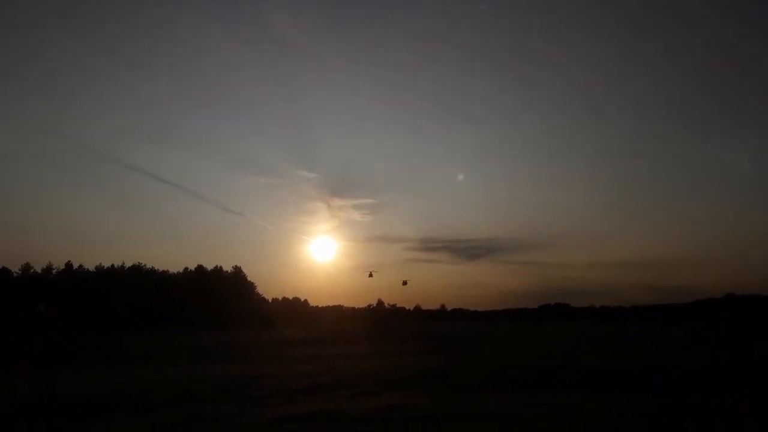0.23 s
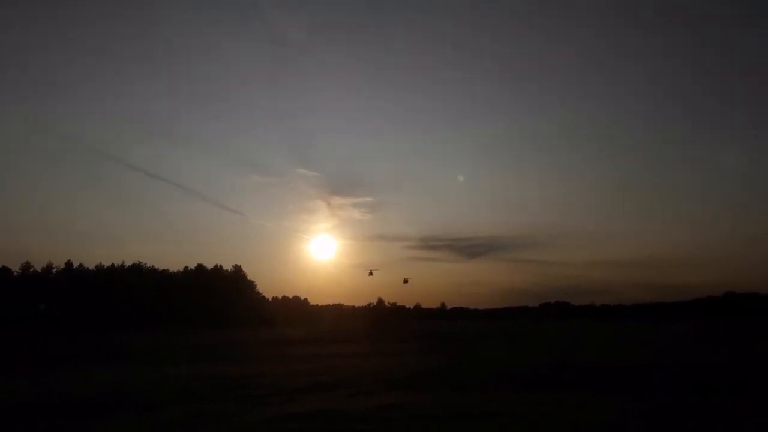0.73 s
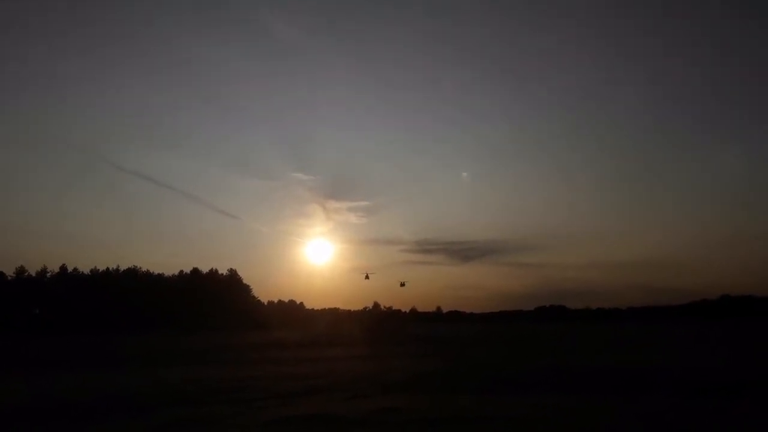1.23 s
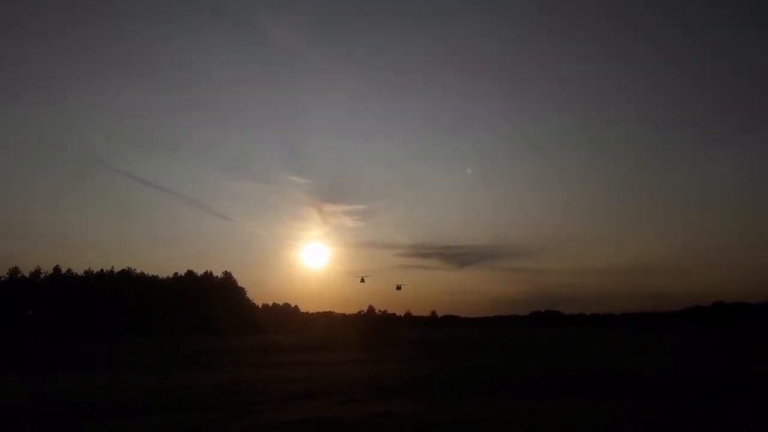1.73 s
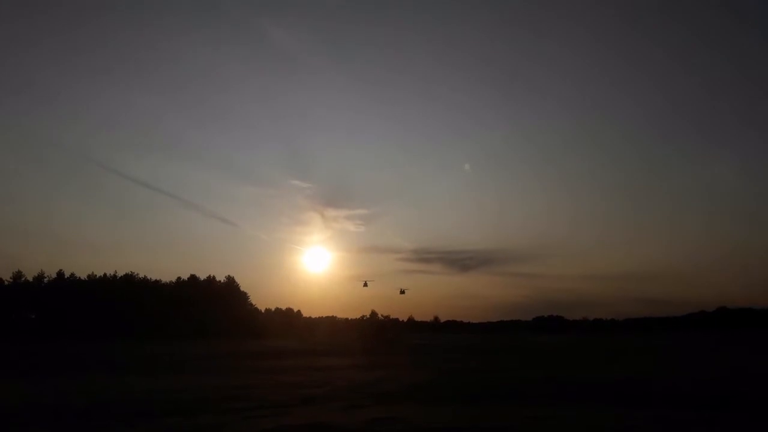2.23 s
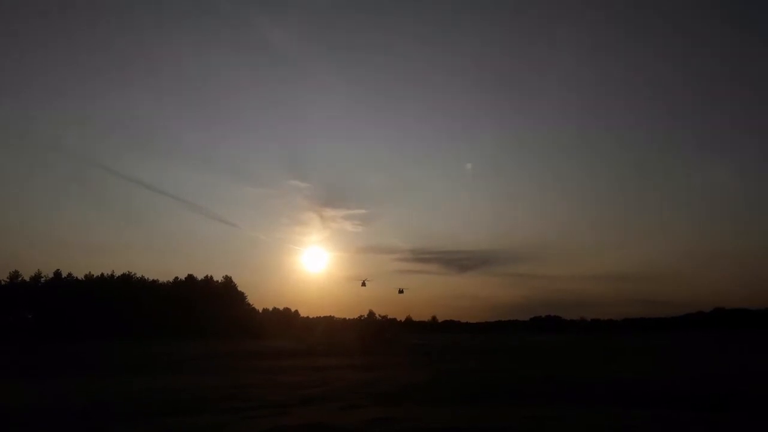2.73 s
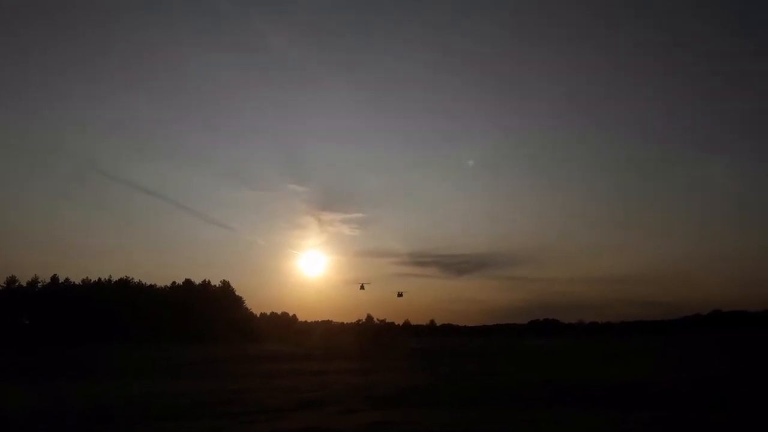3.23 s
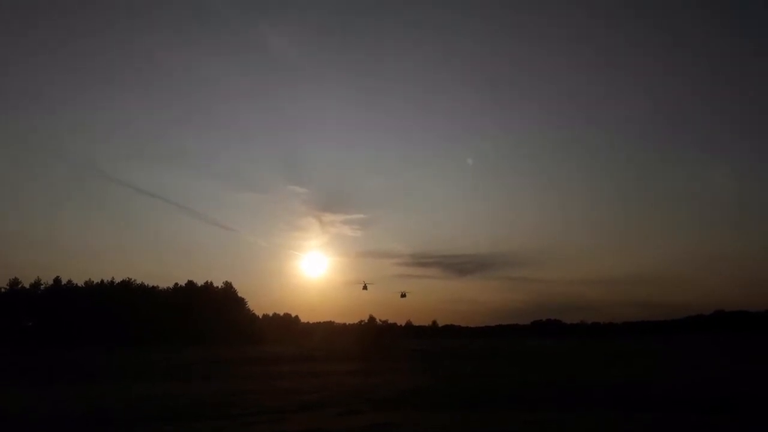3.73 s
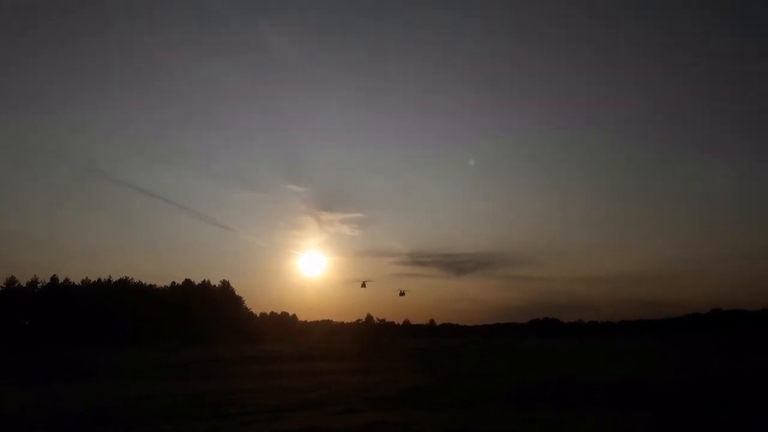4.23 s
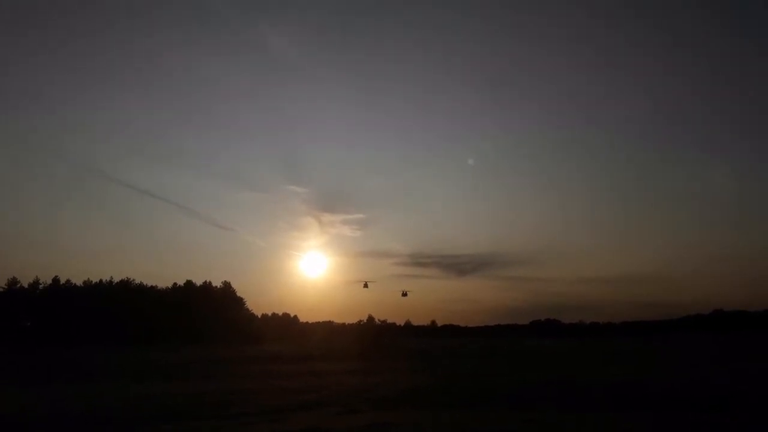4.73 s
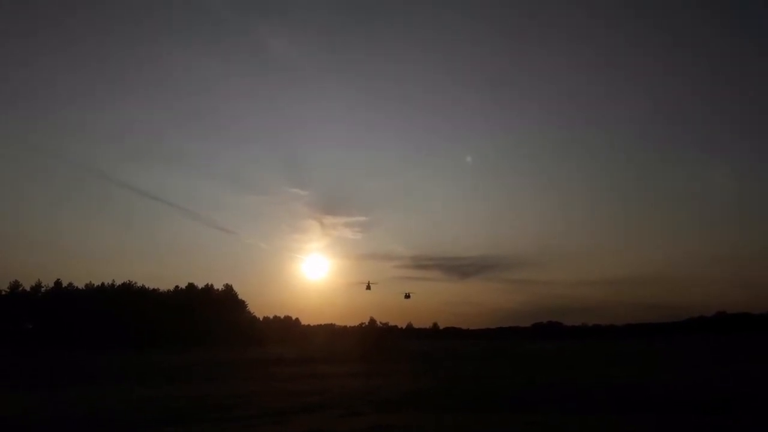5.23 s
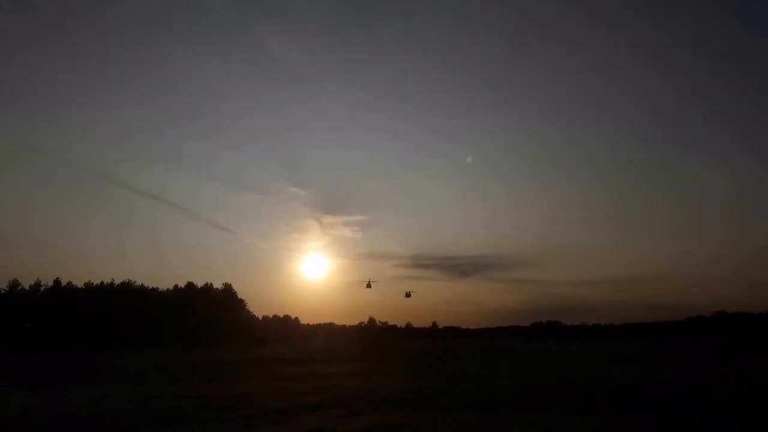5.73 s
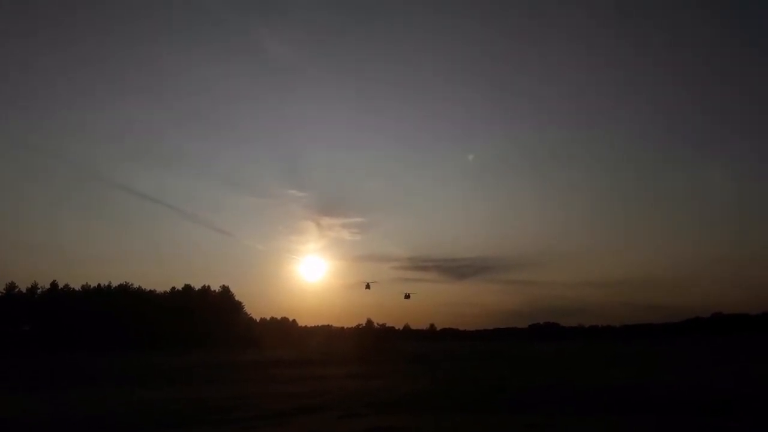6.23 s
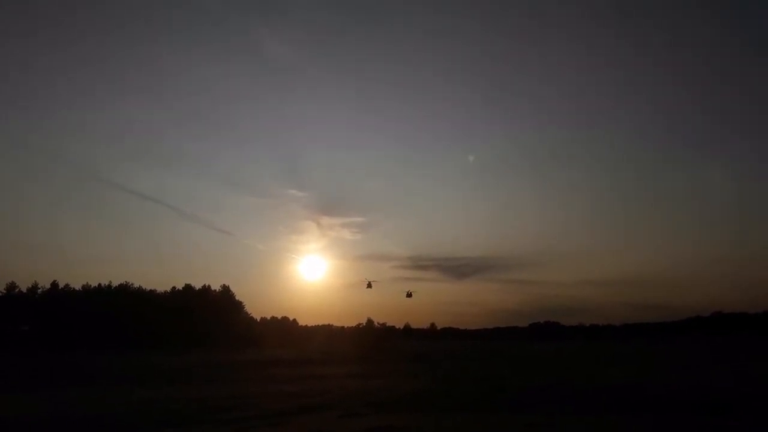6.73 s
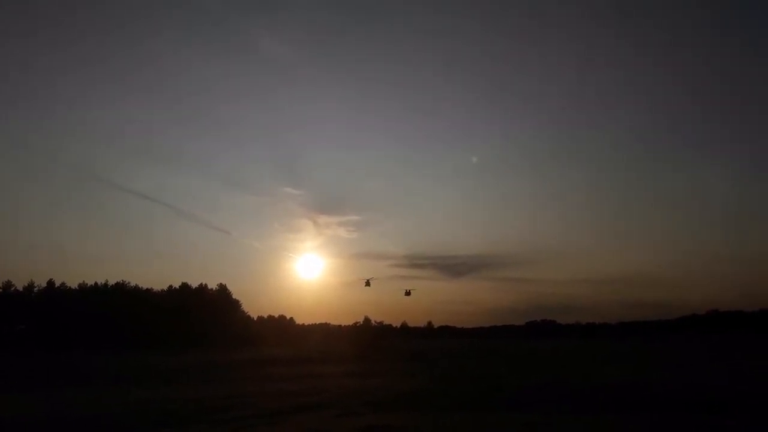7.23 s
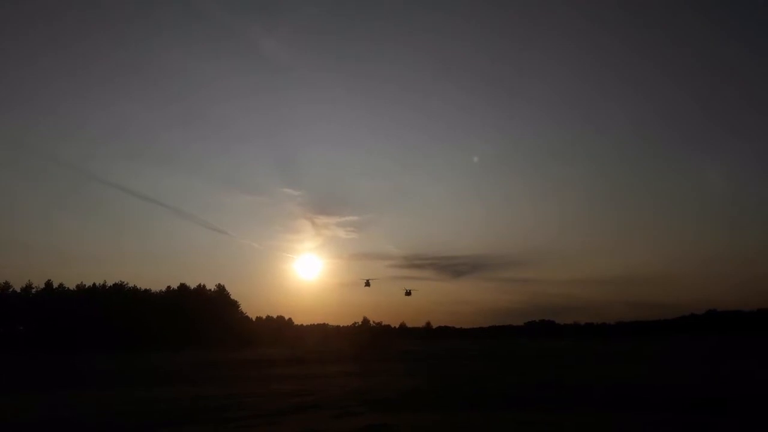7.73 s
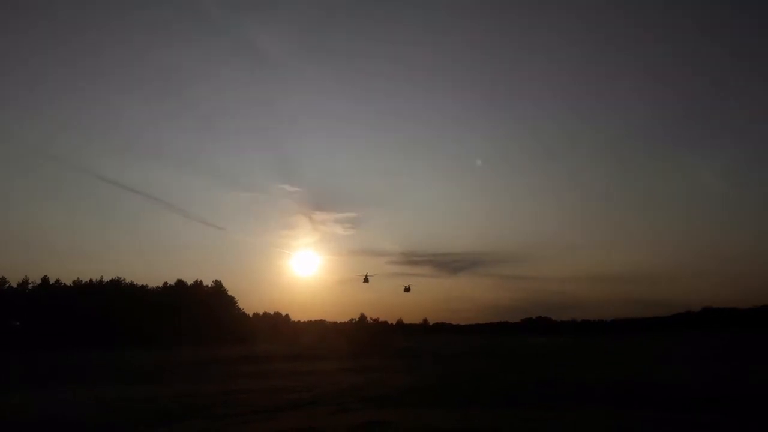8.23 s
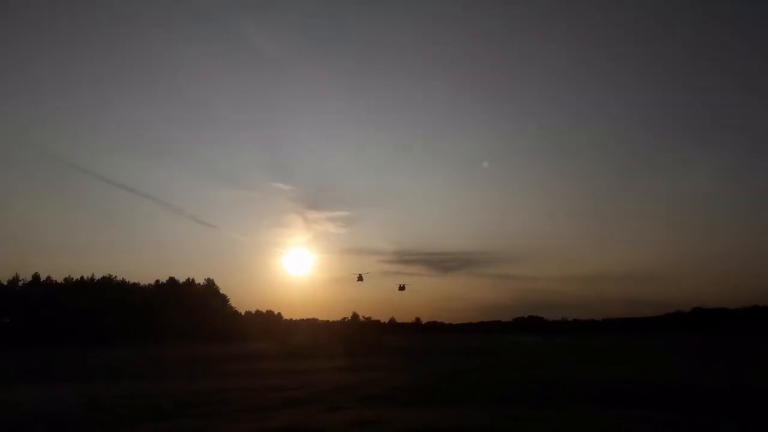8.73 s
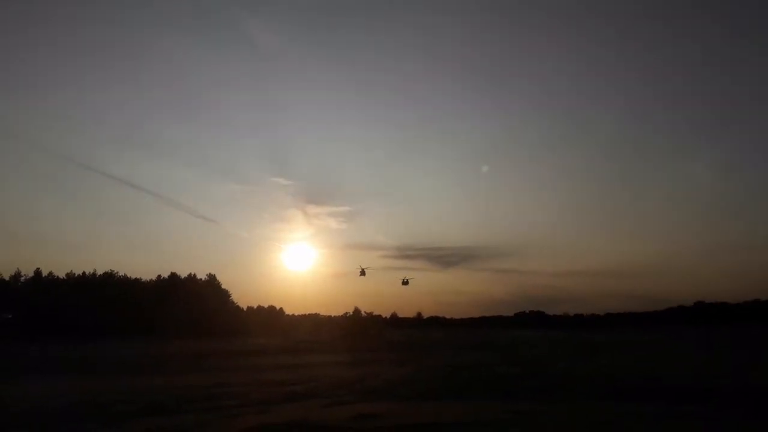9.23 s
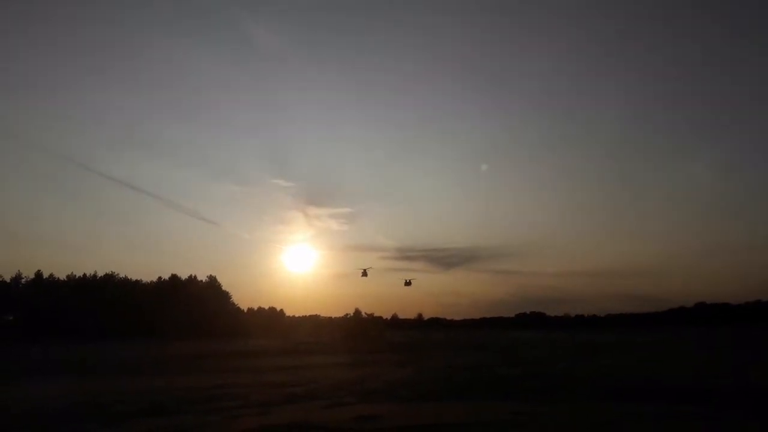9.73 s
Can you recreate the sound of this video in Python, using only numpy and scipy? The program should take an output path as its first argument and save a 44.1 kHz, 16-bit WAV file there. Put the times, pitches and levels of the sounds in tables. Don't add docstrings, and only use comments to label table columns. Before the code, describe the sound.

A distant open-air microphone picks up two heavy helicopters coming closer, their rapid chopping present from the start. Each beat is a low thud with a ragged, fluttering slap, one aircraft's pulses falling between the other's. A short burst of crisp stalk snaps and grass rustle comes close by in the first second. The rotor beat then surges and wavers, gaining crackle and hiss over a steady rumbling wash, with soft ground reflections and faint insects.

```python
import sys
import numpy as np
from scipy import signal
from scipy.fft import rfft, irfft, next_fast_len
from scipy.io import wavfile
from scipy.ndimage import uniform_filter1d, minimum_filter1d, map_coordinates

SR = 44100
rng = np.random.default_rng(int(sys.argv[2]) if len(sys.argv) > 2 else 0)


def attenuation_scalar(level_db):
    decades = np.asarray(level_db, float) / 20
    return 10 ** decades


def output_pcm(signal):
    pcm = np.clip(np.atleast_2d(signal).T, -1, 1) * 32767
    wavfile.write(sys.argv[1], SR, np.round(pcm).astype(np.int16))


N = 440559
BLADE_HZ = 11.8
SLAP_LEAD_S, SLAP_SAMPLES = .04, 4400


def unit(x):
    return x / np.sqrt(np.mean(x ** 2, axis=-1, keepdims=True) + 1e-20)


def along(points, hz):
    f, v = np.transpose(points)
    return np.interp(np.log(hz + 1), np.log(f + 1), v)


def curves(rows):
    s, *cols = np.transpose(rows)
    return [np.interp(np.arange(N) / SR, s, c) for c in cols]


def wobble(rate):
    knots = rng.standard_normal(int(N * rate / SR) + 4)
    return map_coordinates(knots, [np.arange(N) * rate / SR])


def filtered(x, response):
    m = next_fast_len(x.shape[-1] + 2048)
    spectrum = rfft(x, m) * response(np.fft.rfftfreq(m, 1 / SR))
    return irfft(spectrum, m)[..., :x.shape[-1]]


def band(hz, lo_hz, hi_hz):
    return 1 / np.sqrt((1 + (lo_hz / (hz + 1)) ** 8) * (1 + (hz / hi_hz) ** 8))


def aircraft(path, snap_db, snap_rise_db, snap_share, narrow=1):
    # time in s, boom gain in dB, treble gain in dB.
    eddies = [(.116, 2, 0.5), (.202, 4, .1), (.622, 4.5, -3), (.709, -4, -0.5), (1.049, -15, 4),
              (1.302, -17, 1.8), (1.681, 3.5, 1.1), (1.767, -7.5, -0.2), (2.027, -2.5, 1.5),
              (2.359, -1, -5), (2.532, 0, -3.5), (2.612, 9.5, 5.5), (3.034, -1.5, -1), (3.718, 7, 1.5),
              (3.885, -6, -0.5), (4.824, 1, 1.5), (5.422, -4.5, -4), (5.505, 1, -2.5), (6.094, -3.5, 0),
              (6.349, 5, 2), (6.51, -3.5, -0.5), (7.81, 4, 0), (7.981, -5.5, -2.5), (8.063, -1.5, -3.5),
              (8.23, 1, 0.5), (8.397, -5, 1.1), (8.482, 9, 1.5), (8.993, -6, 1), (9.498, -3.5, -0.5),
              (9.753, 4, -1.2)]
    # time in s, gain in dB.
    cracks = [(1.853, 4.5), (2.027, 8), (2.231, 4.5), (3.29, 4), (3.461, 3.5), (3.545, 6), (3.718, 5),
              (5.843, 3), (6.262, -1), (7.142, 3.5), (7.981, -3), (8.482, 2.5), (9.667, 2)]
    jitter_s = .0021
    s, delay_ms, *controls = np.transpose(path)
    turns = np.arange(int(s[0] * BLADE_HZ) - 1, N / SR * BLADE_HZ) / BLADE_HZ
    at = turns + np.interp(turns, s, delay_ms) / 1000
    strength_db, boom_db, comb_db, lag_ms = (np.interp(at, s, c) for c in controls)
    boom_gain_db, treble_gain_db = struck(at, eddies)
    upper_db = strength_db + treble_gain_db
    low_db = strength_db + boom_db + boom_gain_db
    top_db = snap_db + snap_rise_db * at + snap_share * upper_db + struck(at, cracks)[0]
    heard = at + jitter_s * rng.standard_normal(len(at))
    rows = np.column_stack([heard, low_db, upper_db + comb_db, upper_db - comb_db, top_db, lag_ms])
    lasting = np.interp(strength_db, [-36.5, -32], [0.95, 1.074])
    return slaps(rows, narrow * lasting)


def struck(at, events):
    s, *gains_db = np.transpose(events)
    hit = np.abs(at[:, None] - s) < .018
    return [hit @ g for g in gains_db]


def slaps(rows, narrow):
    # time in s, spread in ms, boom top in Hz.
    cluster_growth = [(0, 6.6, 376), (4, 6.56, 353), (5, 8.7, 359), (6.601, 9.2, 340), (7.3, 8.7, 194),
                      (8.4, 7.1, 201), (9.3, 5.3, 315), (10, 8.4, 334)]
    # time in s, pitch factor.
    knock_climb = [(0, 1.28), (1.9, 0.93), (2.6, 0.71), (2.95, 1.65), (3.4, 1.03), (4.8, 0.97), (5.2, 1.14),
                   (5.6, 1.02), (8.4, 1.03), (10, 0.92)]
    start, lag_ms = rows[:, :1], rows[:, 5]
    s, spreads, tops = np.transpose(cluster_growth)
    spread_ms = narrow * np.interp(rows[:, 0], s, spreads)
    top_hz = np.interp(start, s, tops)
    climb = np.interp(start, *np.transpose(knock_climb))

    chance = rng.random((len(rows), 3, SLAP_SAMPLES))
    arrivals = (chance[:, 0] < 600 / SR) * attenuation_scalar(-2.9 * np.log(chance[:, 1] + 1e-4))
    arrivals = arrivals * np.where(chance[:, 2] < .4, -1, 1)
    blur = chance[:, 2] - .5

    boom = cluster(rows, 70 + 0.17 * top_hz, top_hz, arrivals + 0.24 * persistent(rows),
                   spread_ms, lag_ms, rows[:, 1])
    knock = cluster(rows, 355 * climb, 700 * climb, arrivals + 0.66 * blur,
                    1.04 * spread_ms, 0.21 * lag_ms, rows[:, 2], rise=1.15)
    crack = cluster(rows, 1123, 2000, arrivals + 1.2 * blur,
                    1.33 * spread_ms, -.65 * lag_ms - 3.5, rows[:, 3], rise=2.3)
    snap = cluster(rows, 2430, 4000 + 230 * start, arrivals + 0.59 * blur,
                   1.37 * spread_ms, -.3 * lag_ms - 2.5, rows[:, 4], rise=1.7)
    return boom + knock + crack + snap


def persistent(rows):
    turn = round(SR / BLADE_HZ)
    eddies = signal.lfilter([1], [1, -.7], rng.standard_normal((len(rows), turn)), axis=0)
    clock = (np.round(rows[:, :1] * SR).astype(int) + np.arange(SLAP_SAMPLES)) % turn
    return np.take_along_axis(eddies, clock, axis=1)


def cluster(rows, lo_hz, hi_hz, arrivals, spread_ms, lag_ms, db, rise=0.78):
    # frequency in Hz, level in dB per Hz.
    slap_spectrum = [(35, -61.5), (60, -54.5), (88, -4), (223, 6.5), (367, -5.5), (536, -7.5), (1060, -17),
                     (1260, -23.5), (1510, -27.5), (3420, -46.5), (7000, -75.5), (9100, -106),
                     (15400, -120)]
    ms = (np.arange(arrivals.shape[1]) / SR - SLAP_LEAD_S) * 1000
    u = (ms - lag_ms[:, None]) / spread_ms[:, None] + 0.24
    shape = np.exp(-np.abs(np.where(u < 0, rise * u, .5 * u)) ** 2.01)
    burst = filtered(arrivals * shape,
                     lambda hz: attenuation_scalar(along(slap_spectrum, hz)) * band(hz, lo_hz, hi_hz) * ground(hz))
    burst = unit(burst * signal.windows.tukey(len(ms), .3))
    burst = burst * np.sqrt(.025 * SR / len(ms)) * attenuation_scalar(db)[:, None]
    first = np.round((rows[:, :1] - SLAP_LEAD_S) * SR).astype(int)
    at = first + np.arange(len(ms)) + SR
    return np.bincount(at.ravel(), burst.ravel(), N + 2 * SR)[SR:][:N]


def ground(hz):
    echo = 1 + 0.21 * np.exp(-1j * (2 * np.pi * hz / 442 - 2.29))
    return echo * band(hz, 1, 6100) ** 2


def thump(rows):
    # frequency in Hz, level in dB.
    pulse_spectrum = [(18, -59.5), (35, -9), (50, -1.5), (80, 9), (110, 14.5), (170, 1), (260, -47),
                      (500, -110)]
    delay_ms, db = curves(rows)
    blades = BLADE_HZ * (np.arange(N) / SR - delay_ms / 1000)
    pulses = np.diff(np.floor(blades), prepend=0) > 0
    return attenuation_scalar(db) * unit(filtered(1. * pulses, lambda hz: attenuation_scalar(along(pulse_spectrum, hz))))


def wash():
    # frequency in Hz, level in dB per Hz.
    wash_spectrum = [(24, -47), (40, -53.5), (134, 1.5), (240, -5), (387, -6), (547, -13.5), (756, -15.5),
                     (1020, -17.5), (1510, -21.5), (3430, -31.5), (7000, -59.5), (9100, -103),
                     (15400, -120)]
    # time in s, nearness from 0 to 1.
    approach = [(0, 0.06), (1.69, 0.7), (4.48, 0.73), (9.99, 1)]
    # far level in dB, gain when near in dB, lateness as an exponent.
    wash_layers = [
        (-27, 2, 1.6),
        (-39.5, 6, 1.2),
        (-53.5, 16, 1.7),
        (-67.5, 12.5, 5),
    ]
    edges_hz = [(95, 1000), (800, 2260), (2200, 6200), (4300, 2300)]
    near = np.abs(curves(approach)[0])

    def response(hz, lo, hi):
        intake = 1 + 0.9 * np.exp(-((hz - 1500) / 89) ** 2)
        return attenuation_scalar(along(wash_spectrum, hz)) * intake * band(hz, lo, hi) * ground(hz)

    out = np.zeros(N)
    for (lo, hi), (far_db, gain_db, late) in zip(edges_hz, wash_layers):
        db = far_db + gain_db * near ** late - 3.5
        unsteady_db = 0.32 * wobble(10.0) + 0.26 * wobble(40)
        noise = filtered(rng.standard_normal(N), lambda hz: response(hz, lo, hi))
        out += attenuation_scalar(db + unsteady_db) * unit(noise)
    return out


def grass():
    # time in s, length in s, level in dB, centre in Hz, width in Hz.
    rustles = [
        (.836, .012, -42, 9000, 9000),
        (0.87, .02, -39.5, 7500, 6500),
        (0.901, 0.012, -36.5, 6450, 8000),
        (0.93, .016, -55, 7000, 3500),
        (1.35, .028, -61, 7300, 1800),
        (1.51, .0073, -56, 7400, 900),
        (1.554, .016, -55, 7540, 1000),
        (3.249, .01, -52.5, 7100, 900),
    ]
    # time in s, level in dB, frequency in Hz.
    stalks = [
        (0.782, -42, 11000),
        (.7930, -28, 5600),
        (.7956, -39, 11600),
        (0.82, -33.5, 12450),
        (.8238, -28, 5650),
        (0.838, -16.5, 12620),
        (0.846, -32, 8950),
        (0.8811, -9, 7610),
        (0.882, -18, 12850),
        (9.9878, -42.5, 11400),
    ]
    t, out = np.arange(N) / SR, np.zeros(N)
    crackle = attenuation_scalar(3.3 * wobble(900))

    def response(f, hz, width_hz):
        port = 1 - 0.75 * np.exp(-((f - 9700) / 1400) ** 2)
        return (width_hz / 63000.0 + np.exp(-((f - hz) / width_hz) ** 2)) * port * (f < 15700)

    for s, length, db, hz, width_hz in rustles:
        near = slice(round((s - .1) * SR), round((s + .1) * SR))
        grains = rng.standard_normal(len(t[near])) * crackle[near]
        grains = filtered(grains, lambda f: response(f, hz, width_hz))
        out[near] += attenuation_scalar(db) * grains * np.exp(-((t[near] - s) / length) ** 4 / 4)
    u = np.arange(60) / SR
    for s, db, hz in stalks:
        out[round(s * SR):][:len(u)] += attenuation_scalar(db) * np.exp(-u / .00014) * np.sin(2 * np.pi * hz * u)
    return out


def dusk():
    # frequency in Hz, level in dB per Hz.
    hiss_spectrum = [(5000, -40), (6000, -4), (7950, -3), (8050, -11), (10000, -10), (12000, -2),
                     (15700, 0), (15800, -60)]
    # time in s, insects in dB, hiss in dB.
    levels = [(0, -65.5, -71), (1.2, -68.5, -72.5), (2.5, -83.5, -74), (8, -85.5, -75.5), (9.2, -80.5, -78),
              (10, -80, -76)]
    insects_db, hiss_db = curves(levels)
    insects = unit(filtered(rng.standard_normal(N), lambda hz: band(hz, 4200, 7900) ** 4))
    hiss = unit(filtered(rng.standard_normal(N), lambda hz: attenuation_scalar(along(hiss_spectrum, hz))))
    breeze = unit(filtered(rng.standard_normal(N), lambda hz: band(hz, 32, 70)))
    out = attenuation_scalar(-64.5) * breeze
    out += attenuation_scalar(insects_db + 0.84 * wobble(6)) * insects
    return out + attenuation_scalar(hiss_db + .8 * wobble(7.3)) * hiss


def scene():
    # time in s, delay behind the blade clock
    # in ms, strength in dB, boom over it in dB, ground favouring knock over crack in dB, boom lag in ms.
    first = [(.15, 31.3, -33.5, 15.5, -1.5, 1.5), (.5, 29, -33.5, 13, 4.5, 1.8),
             (.9, 30.2, -33.5, 13.5, 1, -1), (1.2, 29, -30.5, 6.5, 8.5, 2), (1.45, 25, -30.5, 1, 4.7, 2),
             (2.2, 29, -29, 12.5, 3.2, 1), (2.9, 20.7, -42.5, 18.5, 3.5, -0.5),
             (3.3, 25.6, -50, 6.5, 3.5, -2.5), (4.8, 18.5, -42.5, 8, 2.5, 0), (5.9, 25, -42, 17.5, 5, -4),
             (6.5, 20.8, -38, 11, 3, 7.5), (6.95, 23.3, -28.5, 4.5, 1.5, -4),
             (7.4, 21, -26.5, 10, 2.5, 4.5), (7.85, 15.6, -25.5, 12, 2, 1.5), (8.3, 9, -23, 9.5, 6.5, 3),
             (8.9, 10.1, -27.5, 12.5, 3.5, -0.3), (9.25, 6.86, -28, 11, -0.3, 3),
             (9.9, 7.7, -26, 9, 4.5, 8)]
    second = [(.1, 65.76, -43.5, 23, -1.5, 0.5), (.9, 66.1, -36, 6.6, -3.5, 4.5),
              (1.35, 64.64, -34.5, 3.7, 2, 4), (1.55, 70.3, -29, 15.5, 8, 1),
              (1.9, 75.45, -24.5, 11, 3, 8.5), (2.15, 74, -24, 12.4, 2, -3.5),
              (2.85, 67.73, -27, 9.2, 3, 2.5), (3.2, 70.43, -28, 14.6, -0.5, 1.5),
              (3.65, 71.03, -23.5, 6.1, 2.3, 2.5), (4.15, 80.14, -23, 8.4, 5.5, 2.5),
              (5.2, 79.77, -28.5, 9.5, 4.5, 6.5), (5.85, 79.24, -19.5, 5.5, 1, 6.5),
              (6.45, 74.05, -21.5, 5.7, 5, 11.5), (6.8, 75.35, -25, 5.4, 6, 7),
              (7.1, 63.95, -33, 3, 0, -1.5), (7.7, 67.96, -39, 3, -4.5, -3.5),
              (8.4, 75.15, -36, 6.8, 8.5, 0.5), (9.4, 80.63, -41, 6.4, -2, 1.5)]
    rear = [(3.2, 31.93, -49.5, 6, -1, 1.5), (4.2, 38.04, -42, 8.5, -5, 1.1),
            (5.3, 39.76, -45.5, 13, -5, 1.4), (6.05, 42, -37, 4.5, 0.5, 1.7),
            (6.7, 43.35, -44, 4.5, -2, 1.6), (7.5, 46.7, -40.5, -5.5, -5, 1.5),
            (8.35, 48.34, -33, 6, -2.5, 0.9), (9.0, 50.75, -45, 9, -6, 1.5), (9.5, 54.8, -48.5, 11, 3, 1.4),
            (10, 58, -34.5, 13.5, -2, 1.6)]
    front = [
        (5.95, 66, -43, -7, .6, .6),
        (6.16, 61, -30.5, -3, .6, .6),
        (6.4, 59.36, -29, -2, 1.1, .6),
        (6.6, 59, -25, -7, .6, 0.75),
        (6.75, 59.5, -62, -6, .6, .6),
    ]
    # time in s, delay in ms, level in dB.
    lead = [(0, 88, -34), (1.2, 67, -37), (2, 87, -27.5), (3, 84, -38), (4, 88, -36), (5, 95, -32.5),
            (6.5, 100, -31.5), (7.5, 110, -28), (8.2, 104, -24.5), (9, 102, -28), (10, 95, -31.5)]
    wing = [(.6, 39.4, -38), (2, 35.15, -36), (3.5, 36.8, -50), (10, 46.4, -33)]
    rotors = aircraft(first, snap_db=-30.5, snap_rise_db=.8, snap_share=0.49)
    rotors += aircraft(second, snap_db=-31, snap_rise_db=0.54, snap_share=0.46)
    rotors += aircraft(rear, snap_db=-26.5, snap_rise_db=1.52, snap_share=0.57, narrow=0.9)
    rotors += aircraft(front, snap_db=-26, snap_rise_db=.1, snap_share=.75, narrow=.35)
    return (rotors + thump(lead) + thump(wing) + wash() + grass() + dusk())[None]


def low_pass(x):
    return signal.sosfilt(signal.butter(12, 16670, fs=SR, output="sos"), x)


def record(dry):
    needed = minimum_filter1d(np.minimum(1, .95 / (np.abs(dry) + 1e-9)), size=801)
    mix = dry * uniform_filter1d(needed, size=400)
    return low_pass(mix)


dry = scene()
out = record(dry)
output_pcm(out)
```